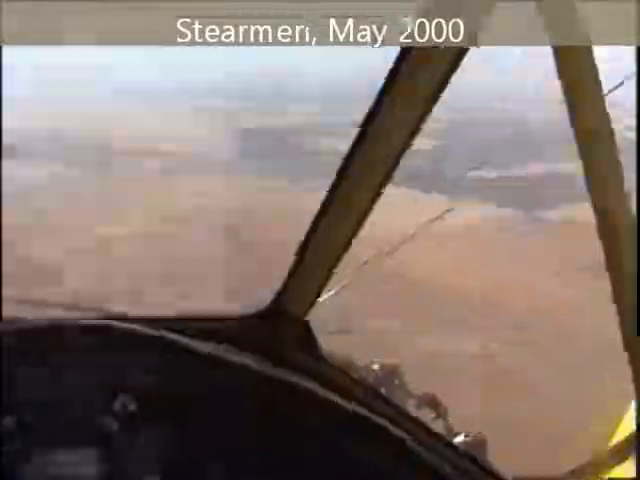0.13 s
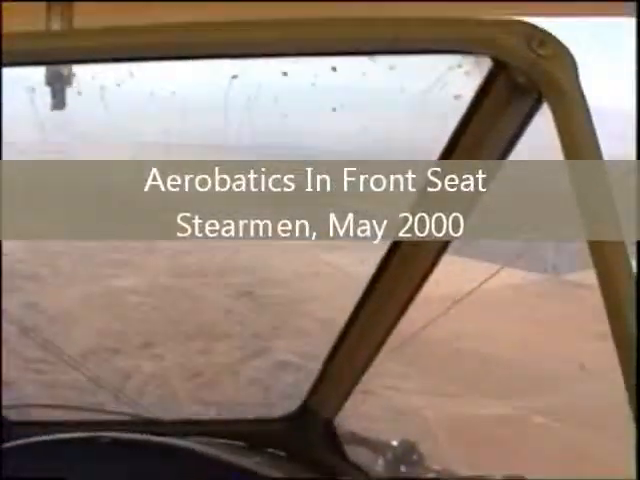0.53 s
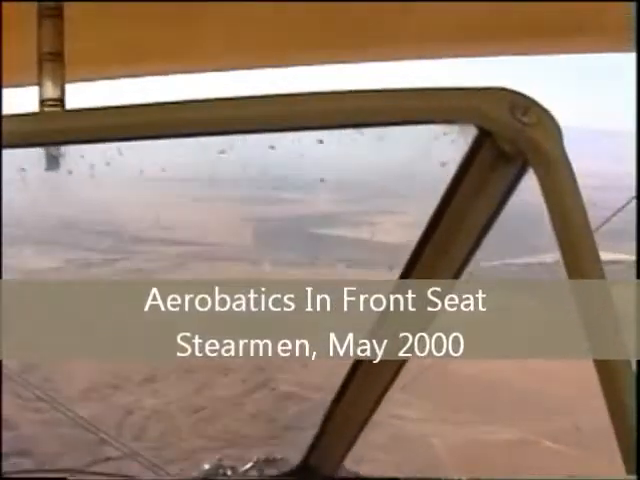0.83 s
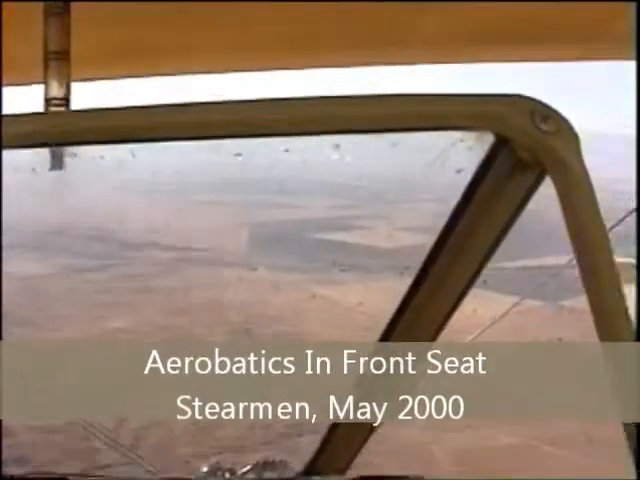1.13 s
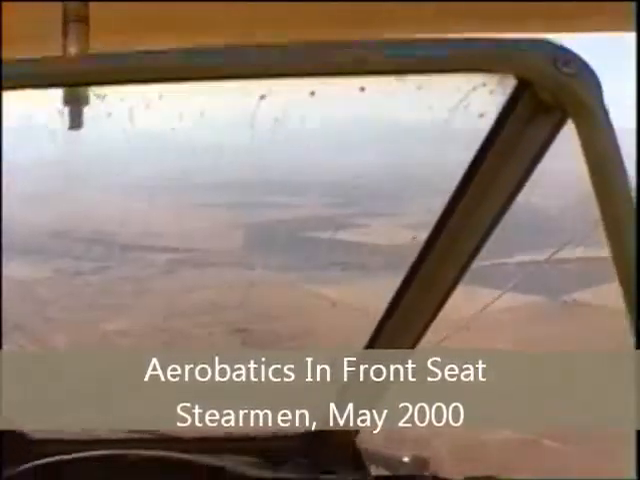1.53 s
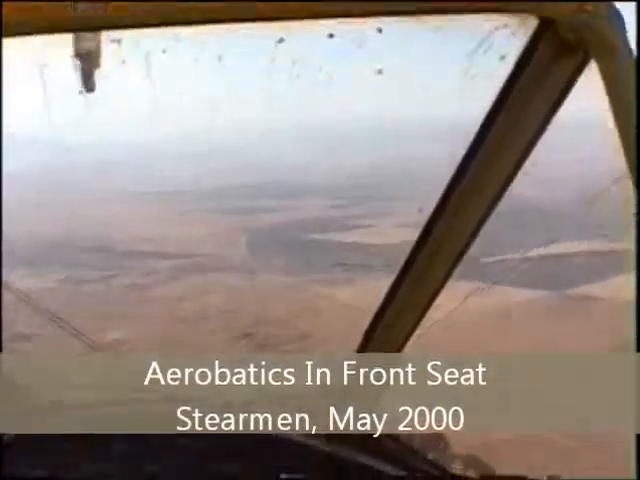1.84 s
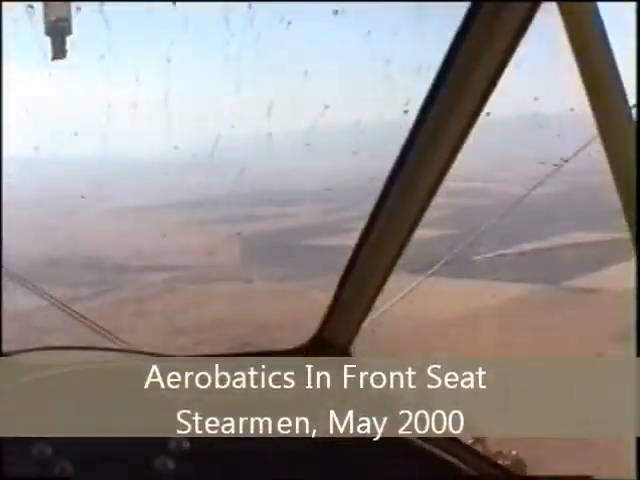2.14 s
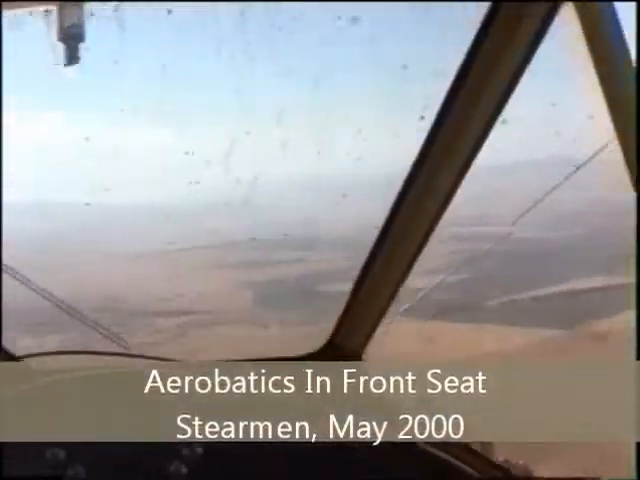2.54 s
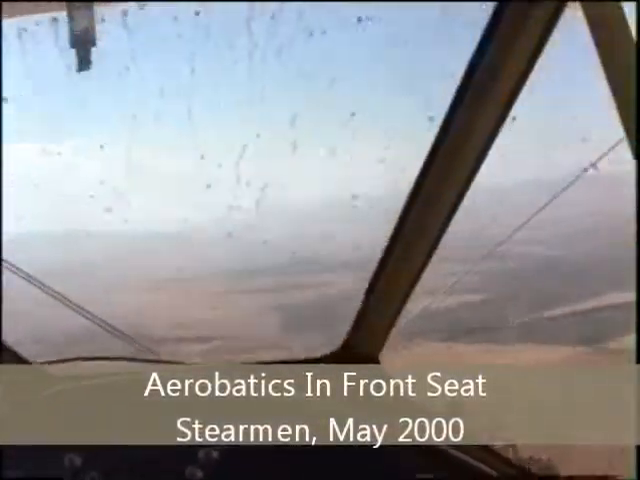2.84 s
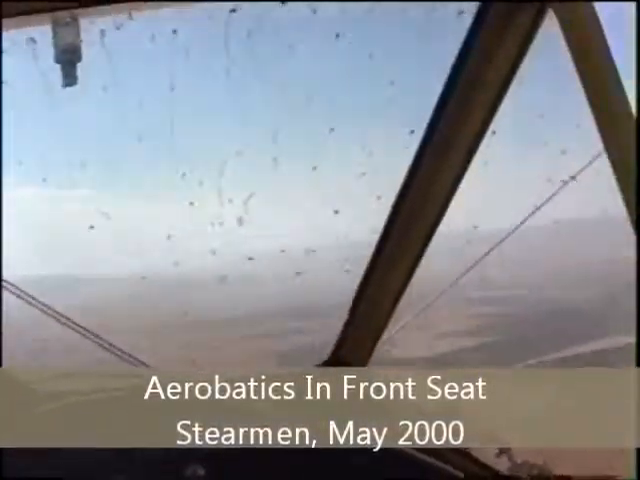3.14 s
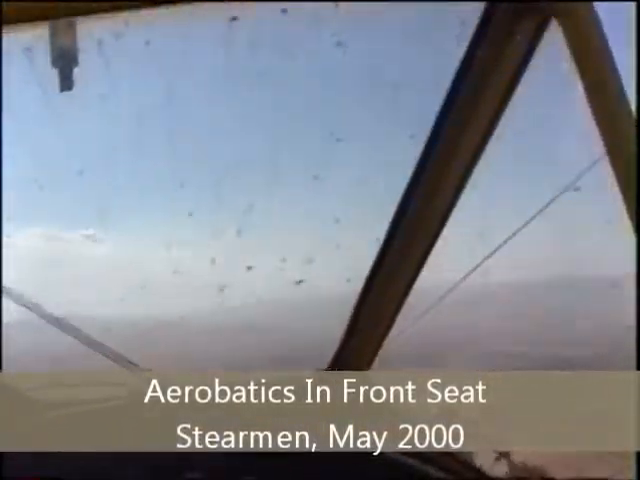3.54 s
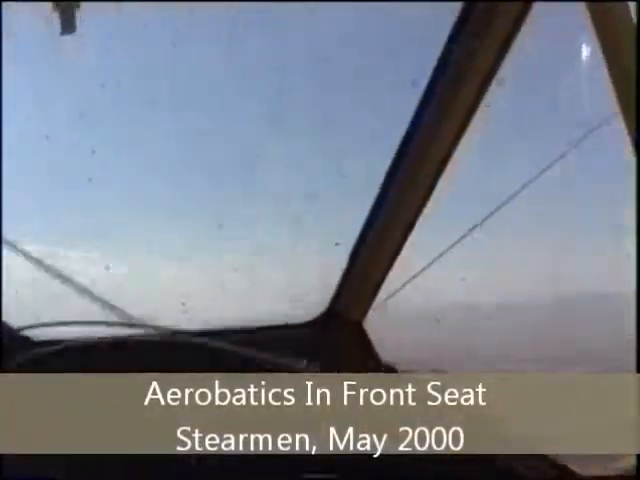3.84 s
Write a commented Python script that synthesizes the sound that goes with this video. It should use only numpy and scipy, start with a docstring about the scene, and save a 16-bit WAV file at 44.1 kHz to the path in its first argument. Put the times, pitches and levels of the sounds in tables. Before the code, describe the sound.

A biplane engine and buffeting wind rise from silence to a steady roar.

```python
"""A seven-cylinder radial engine in steady flight, heard from a biplane's open cockpit.
It drones on multiples of its cycle rate; the exhaust rasps with every firing.
The slipstream buffets the microphone and hisses past the windscreen, where an edge whistles in fits
as the airflow quickens. The whole sound fades in from silence."""
import sys
import numpy as np
from scipy import signal
from scipy.fft import rfft, irfft, next_fast_len
from scipy.io import wavfile
from scipy.ndimage import map_coordinates

SR = 44100
rng = np.random.default_rng(int(sys.argv[2]) if len(sys.argv) > 2 else 0)


def pcm_store(signal):
    """Save signal as 16-bit PCM."""
    levels = np.round(np.clip(np.atleast_2d(signal), -1, 1) * 32767)
    wavfile.write(sys.argv[1], SR, levels.astype(np.int16).T)


N = 176400
TIME_S = np.arange(N) / SR
CYCLE_HZ, CYLINDERS = 15.86, 7  # one cycle = two shaft turns
SIDES = np.array([[1], [-1]])  # left, right


def amp(db):
    """dB to gain."""
    return 10 ** (np.asarray(db) / 20)


def unit(x):
    """Scale to rms 1."""
    return x / np.sqrt(np.mean(x ** 2) + 1e-20)


def pan(left_db):
    """Stereo gains: left up, right down by left_db."""
    return amp(left_db * SIDES)


def wobble(rate_hz):
    """Smooth random curve, rate_hz knots a second."""
    return map_coordinates(rng.standard_normal(N // 50), [TIME_S * rate_hz], mode="mirror")


def filtered(x, response):
    """FFT filter with gain response(hz)."""
    size = x.shape[-1]
    padded = next_fast_len(size + 8192)
    hz = np.fft.rfftfreq(padded, 1 / SR)
    return irfft(rfft(x, padded) * response(hz), padded)[..., :size]


def coloured(x, spectrum):
    """Shape x by (frequency [Hz], level [dB]) points; rms 1."""
    knots_hz, db = np.transpose(spectrum)
    return unit(filtered(x, lambda hz: amp(np.interp(np.log(hz + 1), np.log(knots_hz + 1), db))))


def drone(cycles):
    """Exhaust note: harmonics of the cycle rate, each wavering in level and phase."""
    # (multiple of cycle rate [1], level [dB])
    orders = [(2, -37), (5, -33), (6, -28), (7, -24), (8, -24.5), (9, -25.5), (10, -38), (11, -30),
              (14, -31.5), (15, -25.5), (16, -27.5), (17, -31.5), (18, -28), (19, -27.5), (20, -26),
              (21, -25), (23, -21), (24, -26.5), (25, -25), (26, -28.5), (27, -27), (28, -29), (29, -31.5),
              (31, -33), (32, -40)]
    jitter_rad, spread_rad, waver_db = 0.37, 0.2, 1.5
    note = np.zeros((2, N))
    for order, db in orders:
        phase = 2 * np.pi * (order * cycles + rng.random()) + jitter_rad * wobble(14)
        offset_rad = spread_rad * rng.standard_normal() * SIDES
        note += amp(db + waver_db * wobble(4.114)) * np.sin(phase + offset_rad)
    return np.sqrt(2) * note


def rasp(cycles):
    """One noise puff per firing; strength varies by cylinder and from firing to firing."""
    # exhaust noise: (frequency [Hz], density [dB])
    spectrum = [(100, -12), (250, -9), (420, -1), (580, -4.5), (800, 0), (1150, -3), (2000, -11.5),
                (3200, -14.5), (5000, -32)]
    scatter_db, rough_db, pulse_depth = 1.16, 1.5, 0.17
    firings = cycles * CYLINDERS
    cylinder_db = scatter_db * unit(rng.standard_normal(CYLINDERS))
    firing_db = cylinder_db[firings.astype(int) % CYLINDERS] + rough_db * wobble(CYCLE_HZ * CYLINDERS)
    puffs = amp(firing_db) * (1 - pulse_depth * np.cos(2 * np.pi * firings))
    return amp(-18) * coloured(puffs * rng.standard_normal(N), spectrum)


def engine(cycles):
    """Drone and rasp from slightly left: louder and earlier on that side."""
    lead_s = 4e-5
    exhaust = drone(cycles) + rasp(cycles)
    return pan(0.4) * filtered(exhaust, lambda hz: np.exp(1j * np.pi * hz * lead_s * SIDES))


def buffet():
    """Air hits each microphone port separately; the largest gusts push one and pull the other."""
    # wind rumble: (frequency [Hz], density [dB])
    spectrum = [(10, -47), (22, -35), (40, -6), (65, -2), (110, -2), (200, -1), (400, -10.5), (600, -14),
                (1000, -34.5), (2500, -64)]
    opposed_share, corner_hz = 0.14, 110
    push = coloured(rng.standard_normal((2, N)), spectrum)
    pull = filtered(push[::-1], lambda hz: opposed_share / (1 + (hz / corner_hz) ** 2))
    return amp(-11) * pan(-0.2) * unit(push - pull)


def slipstream():
    """Broad rush plus frame hiss that rises in pitch with airflow; both swell and shake in eddies."""
    # airflow past the windscreen: (time [s], relative speed [1])
    speeds = [(0, 0.91), (1.4, 0.91), (2.2, 0.94), (2.6, 1), (4, 1.02)]
    # slipstream rush: (frequency [Hz], density [dB])
    rush_spectrum = [(250, -13), (700, 2), (1100, -0.5), (2000, -4), (4000, -4.5), (7000, -6), (10000, -7),
                     (12500, -13.5), (16000, -23)]
    # windscreen frame hiss at speed 1: (frequency [Hz], density [dB])
    hiss_spectrum = [(3500, -35), (5200, -17), (6200, -0.5), (7000, -2), (8200, 1.5), (9200, -6),
                     (11000, -16.5), (16000, -13)]
    eddy_db, gust_db, db_per_speed = 0.84, 0.26, 18.5
    speed = np.interp(TIME_S, *np.transpose(speeds))
    rush = amp(-15) * pan(0.5) * coloured(rng.standard_normal((2, N)), rush_spectrum)
    steady = coloured(rng.standard_normal((2, N + N // 4)), hiss_spectrum)
    swept = np.array([map_coordinates(side, [np.cumsum(speed)], order=5, mode="mirror")
                      for side in steady])
    hiss = amp(-18.5) * pan(-3) * unit(swept)
    shake_db = eddy_db * (wobble(55) + wobble(260)) + gust_db * wobble(12)
    return amp(shake_db + db_per_speed * (speed - 1)) * (rush + hiss)


def whistle(cycles):
    """Edge tone: pulses once per propeller turn, swells, and at times locks into a short chirp."""
    # whistling band: (frequency [Hz], density [dB])
    spectrum = [(2300, -24), (2880, -12), (3040, -1.5), (3230, -6.5), (3550, -14), (4400, -28)]
    # band swells: (time [s], level [dB])
    swells = [(0, -38), (1.4, -37), (2.02, -27), (2.13, -23), (2.33, -26), (2.5, -22.5), (2.95, -24.5),
              (3.07, -27.5), (3.2, -23), (3.38, -22.5), (3.52, -29), (3.62, -20.5), (4, -20.5)]
    # locked tones: (time [s], relative level [dB], pitch [Hz])
    chirps = [(2.528, -16, 3090), (2.664, -11, 3220), (2.748, -14.0, 3070), (3.185, -16, 3090),
              (3.393, -12.5, 3130), (3.668, -12, 3140.0), (3.715, -11, 3150), (3.767, -12, 3070.0),
              (3.845, -9.5, 3026), (3.879, -7, 3050.0), (3.933, -6, 3045), (3.949, -10, 3010)]
    pitch_swing, pulse_db, flutter_db, lead_rad = 0.012, 4.5, 2, 0.88
    chirp_sigma_s, chirp_trim_db, chirp_swing = 0.0034, -1.5, 0.018
    band = signal.hilbert(coloured(rng.standard_normal(N), spectrum))
    band = map_coordinates(band, [np.cumsum(1 + pitch_swing * wobble(25))], mode="mirror")
    turns = 2 * cycles
    flutter = unit(amp(pulse_db * np.cos(2 * np.pi * turns) + flutter_db * wobble(70)))
    tone = band * flutter * amp(np.interp(TIME_S, *np.transpose(swells)))
    warped_s = np.cumsum(1 + chirp_swing * wobble(200)) / SR
    for centre_s, db, hz in chirps:
        envelope = amp(db + chirp_trim_db) * np.exp(-0.5 * ((TIME_S - centre_s) / chirp_sigma_s) ** 2)
        tone += envelope * np.exp(2j * np.pi * hz * warped_s)
    return pan(1.5) * np.real(tone * np.exp(0.5j * lead_rad * SIDES))


def scene():
    """Engine and wind at the front seat; shaft speed wanders slightly."""
    rate_hz = CYCLE_HZ * (1 + 0.0012 * wobble(2.975))
    cycles = np.cumsum(rate_hz) / SR
    return engine(cycles) + buffet() + slipstream() + whistle(cycles)


def record(dry):
    """Soft clip, linear fade-in, low-pass."""
    ceiling = 0.88
    fade_start_s, fade_s = 0.18, 3.283
    cutoff_hz, transition_hz = 15900, 150
    rounded = dry / (1 + np.abs(dry / ceiling) ** 6) ** (1 / 6)
    fade = np.clip((TIME_S - fade_start_s) / fade_s, 0, 1)
    return filtered(rounded * fade, lambda hz: np.clip((cutoff_hz - hz) / transition_hz + 0.5, 0, 1))


dry = scene()
out = record(dry)
pcm_store(out)
```